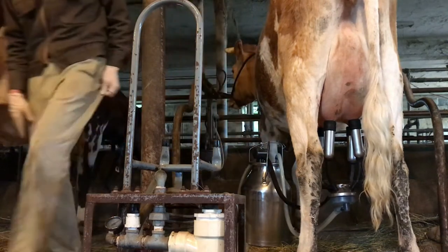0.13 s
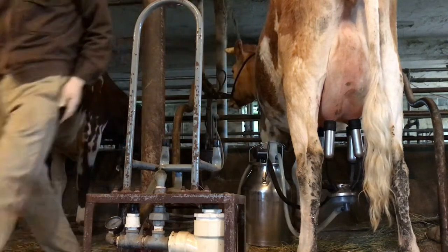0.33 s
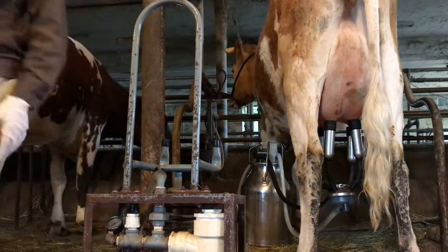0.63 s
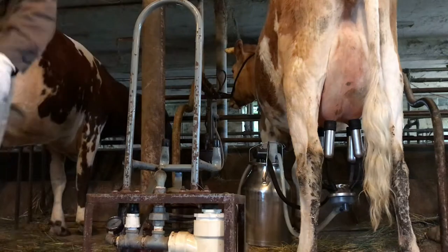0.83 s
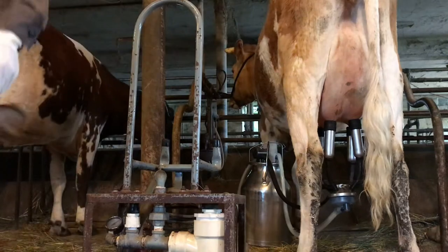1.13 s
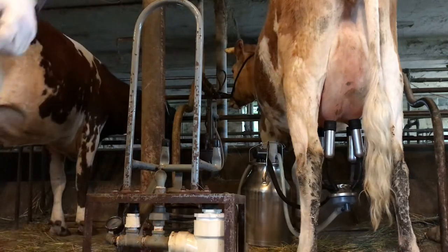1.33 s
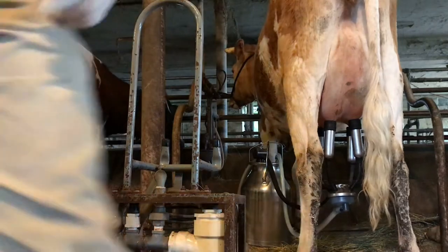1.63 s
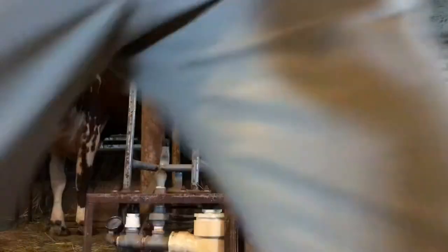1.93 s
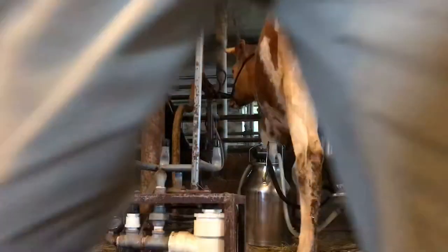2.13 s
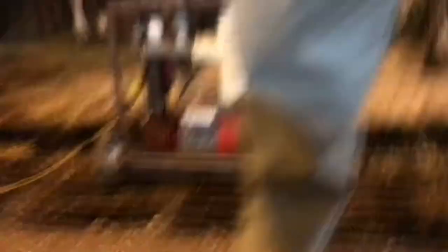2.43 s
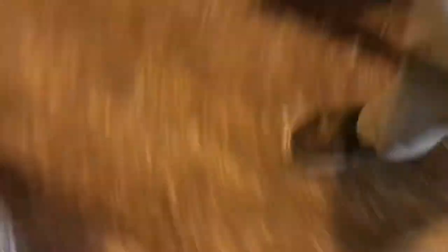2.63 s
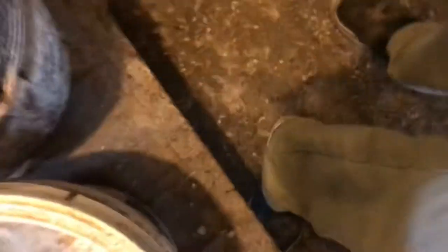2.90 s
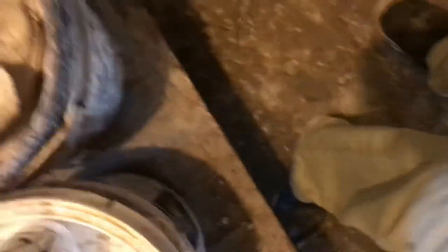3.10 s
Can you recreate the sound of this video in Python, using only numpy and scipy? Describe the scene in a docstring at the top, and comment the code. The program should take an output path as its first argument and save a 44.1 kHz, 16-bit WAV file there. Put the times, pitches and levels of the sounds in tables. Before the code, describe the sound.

A vacuum pump runs throughout, a loud, steady buzzing drone with low hum, loose-panel rattle and bright, chattering metallic hiss in a barn with short reverberation. Faint airy pulsator ticks come about every half second until 2.2 s. The level dips slightly around 1.5 s. Dull handling knocks fall at 2.1-2.3 s and fainter near 2.55 s as the tone shifts. Near-silence from 3.06 to 3.15 s, then the drone returns abruptly.

```python
"""A rotary-vane vacuum pump drives a milking machine in a barn. From the start its shaft orders hum, its
housing buzzes, loose panels rattle and chattering vanes excite bright metal resonances, while the pulsator
spits noise about twice a second. Near 1.5 s levels dip as someone passes in front of the microphone; from
about 2.1 s damped low knocks sound as it is bumped, and by 2.6 s it is carried off and the housing's
spectrum has changed. Just after 3 s the sound cuts out briefly, then returns."""
import sys
import numpy as np
from scipy import signal
from scipy.fft import rfft, irfft
from scipy.io import wavfile

SR = 44100
rng = np.random.default_rng(int(sys.argv[2]) if len(sys.argv) > 2 else 0)


def put_to_file(sound):
    """Save the sound as 16-bit audio at rate SR, in the file named by the first command-line argument."""
    columns = np.atleast_2d(sound).T  # one column per channel
    safe = np.clip(columns, -1, 1)
    whole_steps = np.round(safe * 32767)
    wavfile.write(sys.argv[1], SR, whole_steps.astype(np.int16))


N = 143766
T = np.arange(N) / SR
HZ = np.fft.rfftfreq(N, 1 / SR)

# Knocks on the microphone: (time [s], relative level [dB], pitch [Hz], decay [s])
BUMPS = [(2.115, -37, 150, .012), (2.13, -34, 62, .025), (2.181, -14, 135, .014), (2.179, -20, 280, .007),
         (2.18, -31, 680, .008), (2.215, -16, 320, .007), (2.219, -19, 170, .01), (2.213, -23, 550, .008),
         (2.287, -30, 370, .007), (2.535, -32, 62, .03), (2.548, -28, 80, .012), (2.61, -38, 66, .045),
         (2.608, -42, 170, .02)]
# Strokes of the pulsator valve: (time [s], level [dB], pitch [Hz])
TICKS = [(.085, -34, 4200), (.612, -29, 4220), (1.12, -32, 4150), (1.646, -34, 4100), (2.155, -41, 4250)]
# Resonances of loose panels: (frequency [Hz], width [Hz], relative level [dB])
RATTLE_MODES = [(917, 36.4, 2.5), (1153, 130, -2.5), (1888, 82, 4), (3050, 69, 3.5)]
# Rattle at the microphone: (time [s], relative level [dB])
RATTLE_LEVEL = [(0, 3.5), (.85, 1.5), (1.55, 0), (1.85, 0), (2.2, -1.5), (2.5, -7.5), (3.0, -3), (3.26, -4)]
# Housing spectrum heard from the front: (frequency [Hz], relative level [dB])
HOUSING_FRONT = [(20, -46), (40, -17), (60, -7), (85, -10), (200, -15), (350, -8), (460, -16.5),
                 (560, -10.5), (700, -8.5), (820, -4.5), (910, 1.5), (1020, -11.5), (1190, -2),
                 (1500, -0.5), (1870, 1.5), (1980, -7), (2200, -0.5), (2480, -6.5), (2850, -3), (3010, -2),
                 (3300, -5.5), (3560, -1.5), (3850, -12), (4250, -12.5), (4600, -4), (4950, -13),
                 (6000, -17), (12000, -41)]
# Housing spectrum heard from above: (frequency [Hz], relative level [dB])
HOUSING_ABOVE = [(20, -51), (60, -8), (150, -10.5), (350, -7.5), (460, -15.5), (720, -7), (900, -3.5),
                 (1020, -19), (1250, 1.5), (1650, 1), (1880, 1.5), (2480, -0.5), (2850, -8), (3010, 6.5),
                 (3300, 0), (3850, -5.5), (4600, -5), (5000, -4), (6000, -18), (12000, -36)]
# Housing at the microphone: (time [s], relative level [dB])
HOUSING_LEVEL = [(0, -0.5), (1.0, .5), (1.55, -2.5), (1.9, -1), (2.2, -1.5), (2.38, -2), (2.65, -1),
                 (3.0, -1), (3.26, -0.5)]
# Resonances of the vanes and casing: (frequency [Hz], width [Hz], relative level [dB])
RING_MODES = [(5358, 154, -5), (5884, 122, 1), (6160, 148, 4), (6626, 192, 0)]
# Ringing at the microphone: (time [s], relative level [dB])
RING_LEVEL = [(0, -23.5), (.5, -22.5), (.9, -22.5), (1.3, -23), (1.5, -25), (1.62, -23.5), (1.76, -22.5),
              (2.08, -21), (2.15, -27.5), (2.23, -19.5), (2.35, -25.5), (2.45, -22), (2.58, -23.5),
              (2.7, -25.5), (2.92, -25.5), (3.04, -28.5)]
# Higher, brighter resonances: (frequency [Hz], width [Hz], relative level [dB])
SIZZLE_MODES = [(7320, 130, -2.5), (7400, 900, -6.5), (8470, 110, -6), (8850, 600, -9), (9340, 150, 2),
                (9630, 180, 1.5), (9980, 190, 2.5), (10700, 200, -3), (11200, 550, -8), (12000, 900, -7),
                (13120, 300, -7), (13750, 650, -8.2), (14520, 200, -4), (15400, 900, -7.8)]
# Bright ringing at the microphone: (time [s], relative level [dB])
SIZZLE_LEVEL = [(0, -24), (.6, -24.5), (1.35, -23.5), (1.47, -26), (1.55, -29.5), (1.72, -23.5),
                (1.84, -23.5), (1.9, -26.5), (1.99, -25.5), (2.08, -28.5), (2.18, -27), (2.27, -24.5),
                (2.33, -20), (2.45, -24.5), (2.66, -26.5), (2.8, -26), (2.97, -25.5), (3.04, -26)]
# Orders that the exhaust beams forward: (multiple of the shaft rate)
EXHAUST_ORDERS = [20, 24, 32, 33, 35, 37, 40, 42, 49, 55]
# Strength of each exhaust order: (relative level [dB])
EXHAUST_DB = [-50, -63, -40.5, -45.5, -52.5, -51, -39.5, -43.5, -46.5, -65]
# Exhaust at the microphone: (time [s], relative level [dB])
EXHAUST_LEVEL = [(0, 0.5), (.65, 0), (1.2, 0.5), (1.55, -2), (2.15, 1.5), (2.4, -2), (2.65, -9),
                 (3.0, -7.5), (3.26, -7.5)]
# Strong orders of the hum: (multiple of the shaft rate)
HUM_ORDERS = [2, 4, 8, 11, 13, 16, 19, 47, 61, 63, 67, 74, 100]
# Strength of each hum order before it wavers: (rms level [dB])
HUM_DB = [-60, -38, -44, -57.5, -53, -63, -57, -52.5, -49, -45, -45, -47.5, -50]

SHAFT_HZ, VANES = 28.465, 4
SPEED_WANDER = 0.00062  # rms, as a fraction of the shaft rate
HUM_WAVER, EXHAUST_WAVER = 0.63, 0.37  # rms, relative to the tone
WAVER_FULL_HZ = 900  # tones above this waver fully

# Share of power that repeats every turn, and depth of the air's vane-rate pulsing
HOUSING_REPEAT, HOUSING_PULSE = 0.3, 0.33
HOUSING_FRONT_DB, HOUSING_ABOVE_DB = -31.5, -30  # before HOUSING_LEVEL
CARRY_START_S, CARRY_END_S = 2.2, 2.6

CHATTER_PER_S, CHATTER_SPREAD_DB = 2200, 3
CHATTER_SHARE = 0.31  # share of power in impacts; rubbing has the rest
VANE_PULSE, SHAFT_PULSE = 0.17, 0.13  # modulation depths
FLUTTER_DB = 0.82  # rms
RING_DB, SIZZLE_DB = -4, -1  # trims on the level tables
RING_END_DB, SIZZLE_END_DB = -24.5, -27.5  # from CUT_END_S on, before the trims

RATTLE_PER_S, RATTLE_SPREAD_DB = 350, 4
RATTLE_DB = -35  # before RATTLE_LEVEL
TICK_WIDTH_HZ, TICK_RISE_S = 260, 0.005
BUMP_RISE_S, BUMP_LOW_HZ = 0.002, 35
BUMP_ROUGH = 0.2  # rms of the random part of the swing
BUMP_DB = 1.5  # trim on BUMPS

BARN_T60_S, BARN_DB = 0.12, -10
BARN_SWELL_HZ = 1.394  # how often each tail swells
CUT_START_S, CUT_END_S = 3.0603, 3.1545
CUT_TAIL_DB, CUT_TAIL_S = -18, 0.0074  # starting level and decay time
EDGE_HZ = 15830  # upper band limit


def amp(db):
    """Definition of the decibel: 20 dB is a tenfold amplitude."""
    return 10 ** (np.asarray(db) / 20)


def unit(x):
    """Normalization of power: scales a signal to rms 1."""
    return x / np.sqrt(np.mean(x ** 2) + 1e-20)


def level(points):
    """Amplitude envelope: gain over time, interpolated in decibels."""
    return amp(np.interp(T, *np.transpose(points)))


def add(mix, s, sound):
    """Superposition: adds a sound into the mix, in place, from time s."""
    part = mix[round(s * SR):][:len(sound)]
    part += sound[:len(part)]


def power_mix(first, second, share):
    """Addition of powers: independent signals, the first with the given share."""
    return np.sqrt(share) * first + np.sqrt(1 - share) * second


def drift(rate_hz):
    """Low-pass random process: noise under a Gaussian spectrum, with mean 0 and rms 1."""
    noise = rfft(rng.standard_normal(N))
    return unit(irfft(noise * np.exp(-(HZ / rate_hz) ** 2) * (HZ > 0), N))


def colour(x, gain):
    """Minimum-phase filtering: folding the cepstrum makes a causal filter of the given gain."""
    cepstrum = irfft(np.log(np.maximum(gain, 1e-5)), N)
    cepstrum[1:N // 2] *= 2
    cepstrum[N // 2:] = 0
    return irfft(rfft(x) * np.exp(rfft(cepstrum)), N)


def resonances(modes):
    """Modal resonance: steep-sided peaks whose powers add."""
    power = 0
    for hz, width, db in modes:
        power = power + amp(db) ** 2 / (1 + ((HZ - hz) / width) ** 2 / 2) ** 4
    return np.sqrt(power)


def spectrum(points):
    """Spectral envelope: gain interpolated in decibels over log frequency."""
    hz, db = np.transpose(points)
    return amp(np.interp(np.log(HZ + 1), np.log(hz), db))


def impacts(per_s, spread_db, cap):
    """Random point process: impulses of either sign, with exponentially spread levels."""
    struck = rng.random(N) < per_s / SR
    strength = amp(spread_db * np.minimum(rng.exponential(1, N), cap))
    return struck * rng.choice([-1, 1], N) * strength


def barn(x):
    """Reverberation: short, sparse tails that shift as bodies and the microphone move."""
    t, wet = T[:SR // 2], np.zeros(N)
    for phase in np.arange(3) / 3:
        reflections = rng.standard_normal(len(t)) * (rng.random(len(t)) < 0.05)
        tail = reflections * amp(-60 * t / BARN_T60_S)
        reverb = signal.fftconvolve(x, tail / np.linalg.norm(tail))[:N]
        # the power of a swing repeats at twice its rate
        wet += np.cos(np.pi * (BARN_SWELL_HZ * T + phase)) * reverb
    return x + amp(BARN_DB) * wet


def bumps():
    """Damped oscillation: handling the microphone gives dull, quickly decaying knocks."""
    out, t = np.zeros(N), T[:SR // 4]
    for s, db, hz, decay in BUMPS:
        swing = -np.sin(2 * np.pi * hz * t) + BUMP_ROUGH * drift(rate_hz=2 * hz)[:len(t)]
        envelope = np.minimum(t / BUMP_RISE_S, 1) * np.exp(-t / decay)
        add(out, s, amp(db) * envelope * swing)
    highpass = signal.butter(4, BUMP_LOW_HZ, "highpass", fs=SR, output="sos")
    return amp(BUMP_DB) * signal.sosfilt(highpass, out)


def pulsator():
    """Band-limited jet noise: each valve stroke lets out a short, pitched spit of air."""
    out, u = np.zeros(N), T[:SR // 10] / TICK_RISE_S
    envelope = u * np.exp(1 - u)  # peaks at 1 when u = 1
    for s, db, hz in TICKS:
        band = resonances([(hz, TICK_WIDTH_HZ, 0)])
        air = unit(colour(rng.standard_normal(N), band))
        add(out, s, amp(db) * envelope * air[:len(u)])
    return out


def rattle():
    """Impact excitation: irregular taps ring the modes of loose panels."""
    taps = barn(impacts(RATTLE_PER_S, RATTLE_SPREAD_DB, cap=3))
    return amp(RATTLE_DB) * unit(colour(taps, resonances(RATTLE_MODES))) * level(RATTLE_LEVEL)


def housing(turns):
    """Source and filter: weaker shaft orders and vane-pulsed air, coloured by the housing."""
    size = 256  # orders below this
    weak = ~np.isin(np.arange(size), [0, *HUM_ORDERS, *EXHAUST_ORDERS])
    one_turn = irfft(weak * np.exp(2j * np.pi * rng.random(size)), size * 64)
    position = np.arange(len(one_turn)) / len(one_turn)
    buzz = unit(np.interp(turns, position, one_turn, period=1))
    noise = rfft(rng.standard_normal(N))
    air = unit(irfft(noise * (HZ < SHAFT_HZ * size), N))
    air *= 1 + HOUSING_PULSE * np.cos(2 * np.pi * VANES * turns)
    drive = power_mix(buzz, air, HOUSING_REPEAT)
    front = amp(HOUSING_FRONT_DB) * unit(colour(drive, spectrum(HOUSING_FRONT)))
    above = amp(HOUSING_ABOVE_DB) * unit(colour(drive, spectrum(HOUSING_ABOVE)))
    carried = np.interp(T, [CARRY_START_S, CARRY_END_S], [0, 1])
    return (front + carried * (above - front)) * level(HOUSING_LEVEL)


def vanes(turns):
    """Forced modal vibration: tiny impacts and rubbing, pulsing with the rotor, ring the metal."""
    hits = unit(impacts(CHATTER_PER_S, CHATTER_SPREAD_DB, cap=5))
    rubbing = rng.standard_normal(N)
    vane_pulse = VANE_PULSE * np.cos(2 * np.pi * VANES * turns)
    shaft_pulse = SHAFT_PULSE * np.cos(2 * np.pi * turns)
    flutter = amp(FLUTTER_DB * drift(rate_hz=26))
    drive = power_mix(hits, rubbing, CHATTER_SHARE) * (1 + vane_pulse + shaft_pulse) * flutter
    drive = barn(drive)
    ring_level = level([*RING_LEVEL, (CUT_END_S, RING_END_DB)])
    sizzle_level = level([*SIZZLE_LEVEL, (CUT_END_S, SIZZLE_END_DB)])
    ring = unit(colour(drive, resonances(RING_MODES))) * ring_level
    sizzle = unit(colour(drive, resonances(SIZZLE_MODES))) * sizzle_level
    return amp(RING_DB) * ring + amp(SIZZLE_DB) * sizzle


def tones(turns, orders, levels_db, waver):
    """Harmonic series: shaft orders, the higher ones wavering more in strength and phase."""
    out = np.zeros(N)
    for k, db in zip(orders, levels_db):
        depth = waver * min(k * SHAFT_HZ / WAVER_FULL_HZ, 1)
        wobble = 1 + depth * (drift(rate_hz=8.1) + 1j * drift(rate_hz=6.2))
        rotation = np.exp(2j * np.pi * (k * turns + rng.random()))
        out += np.sqrt(2) * amp(db) * (wobble * rotation).real
    return out


def exhaust(turns):
    """Directivity: orders beamed forward follow their own level at the microphone."""
    return tones(turns, EXHAUST_ORDERS, EXHAUST_DB, EXHAUST_WAVER) * level(EXHAUST_LEVEL)


def hum(turns):
    """Periodic forcing: rotation gives strong tones at multiples of the shaft rate."""
    return tones(turns, HUM_ORDERS, HUM_DB, HUM_WAVER)


def scene():
    """Superposition: the sources add in one mono signal, the rotating ones locked to one shaft."""
    speed = SHAFT_HZ * (1 + SPEED_WANDER * drift(rate_hz=5.6))
    turns = np.cumsum(speed) / SR
    background = bumps() + pulsator() + rattle()
    pump = housing(turns) + vanes(turns) + exhaust(turns) + hum(turns)
    mono = background + pump
    return np.array([mono, mono])


def record(dry):
    """Gating and band limitation: a brief cut with a faint decaying tail, then a low-pass."""
    live = (T < CUT_START_S) | (T > CUT_END_S)
    tail = amp(CUT_TAIL_DB) * np.exp(-abs(T - CUT_START_S) / CUT_TAIL_S)
    gate = np.where(live, 1, tail)
    lowpass = signal.firwin(1023, EDGE_HZ, window=("kaiser", 9), fs=SR)
    return signal.oaconvolve(dry * gate, lowpass[None], "same")


dry = scene()
out = record(dry)
put_to_file(out)
```